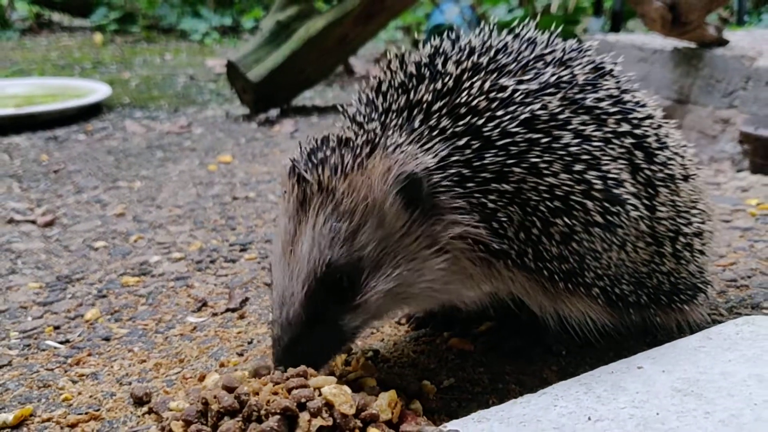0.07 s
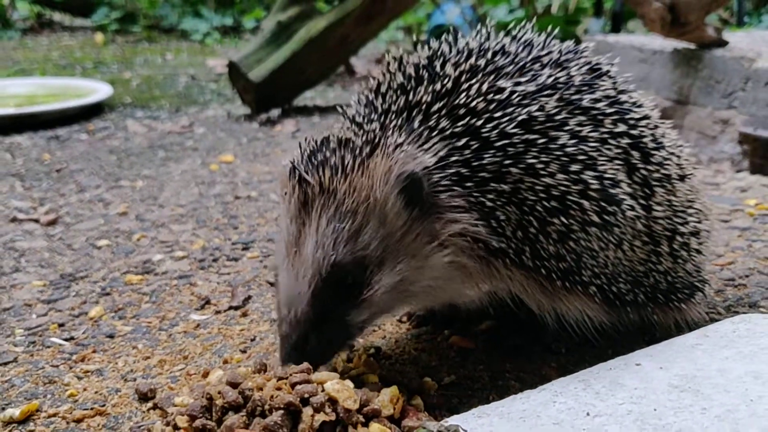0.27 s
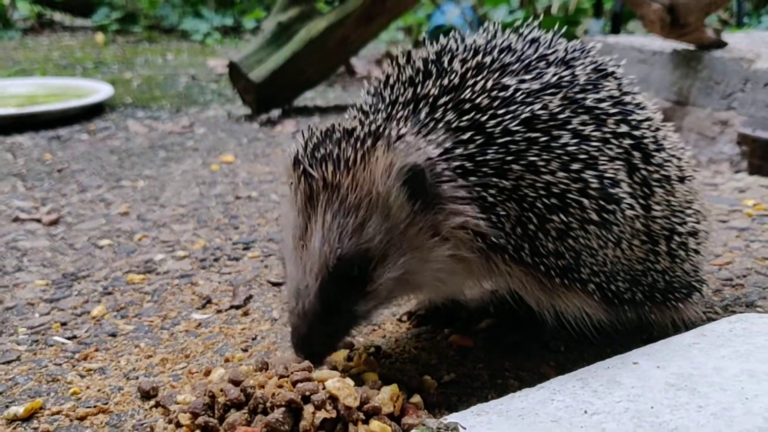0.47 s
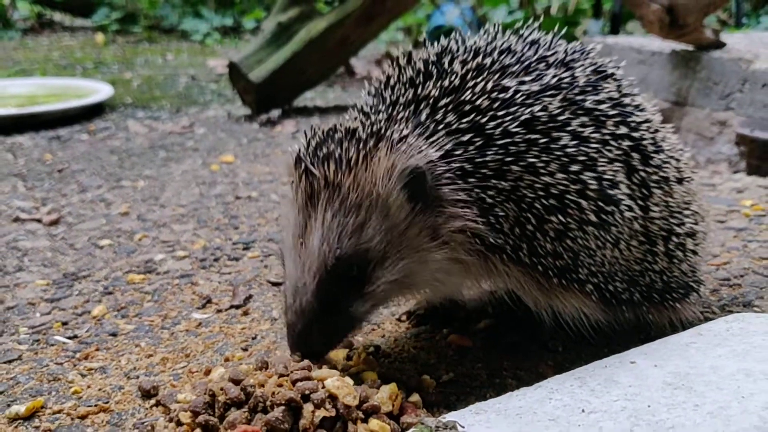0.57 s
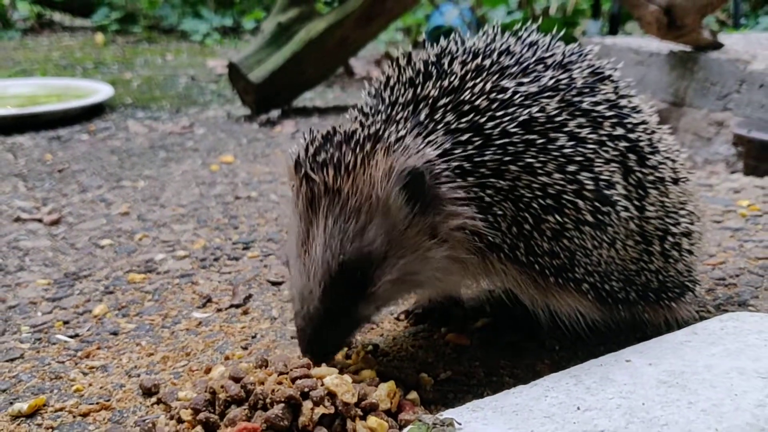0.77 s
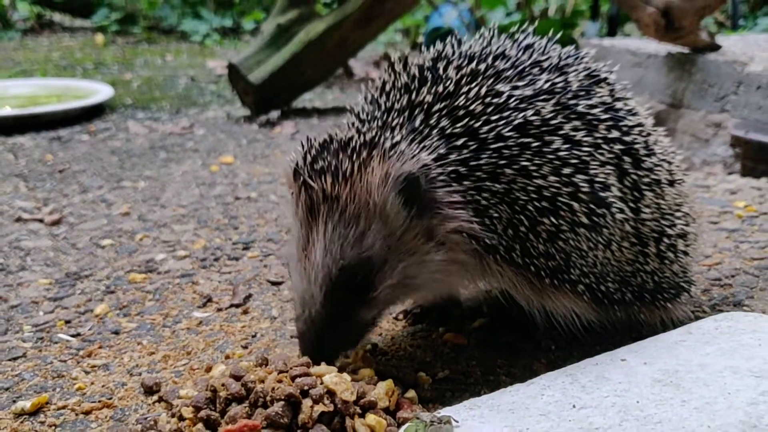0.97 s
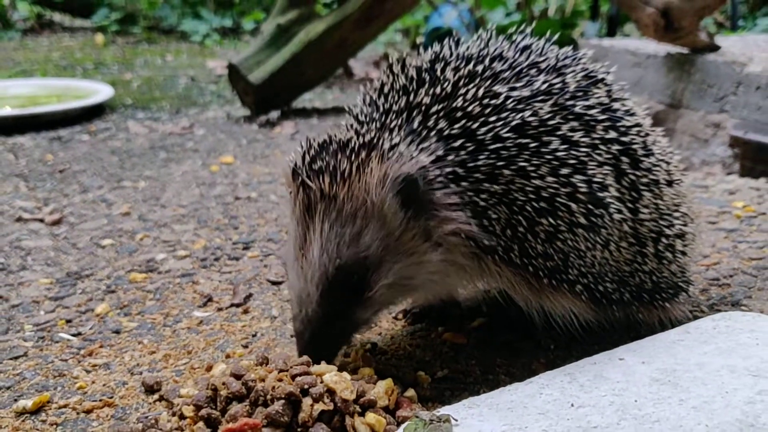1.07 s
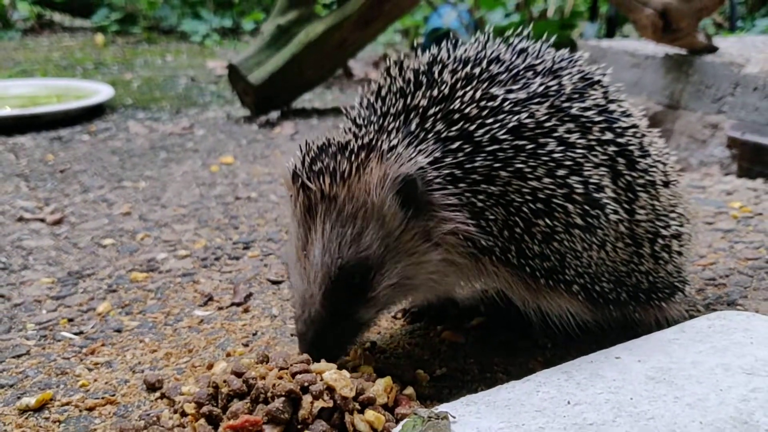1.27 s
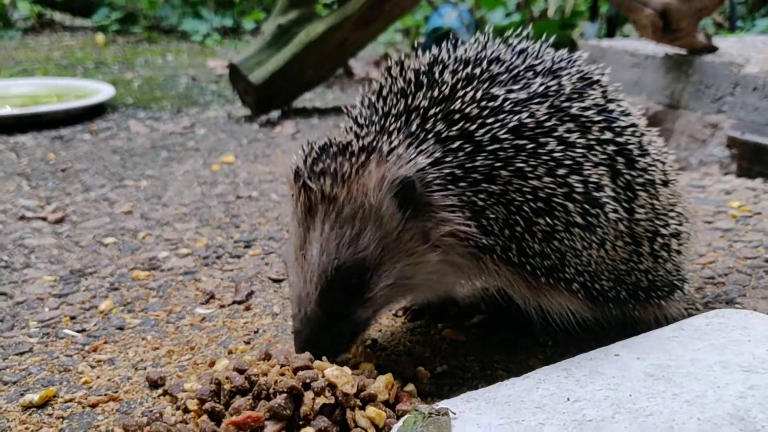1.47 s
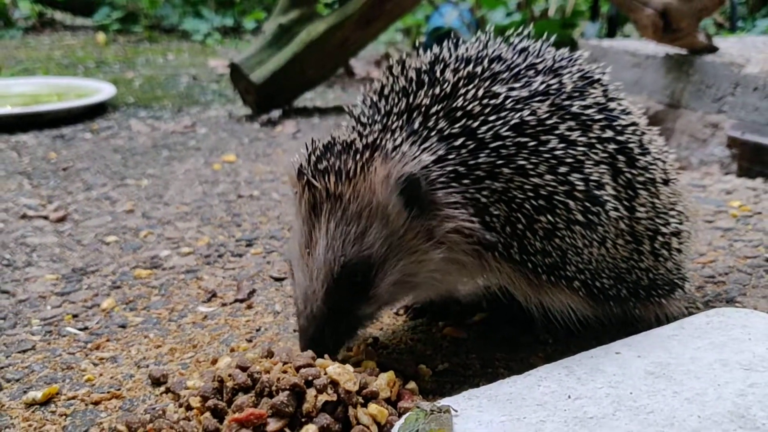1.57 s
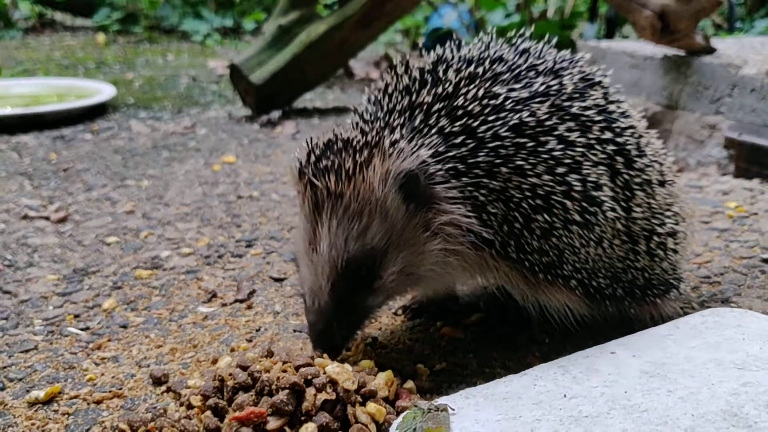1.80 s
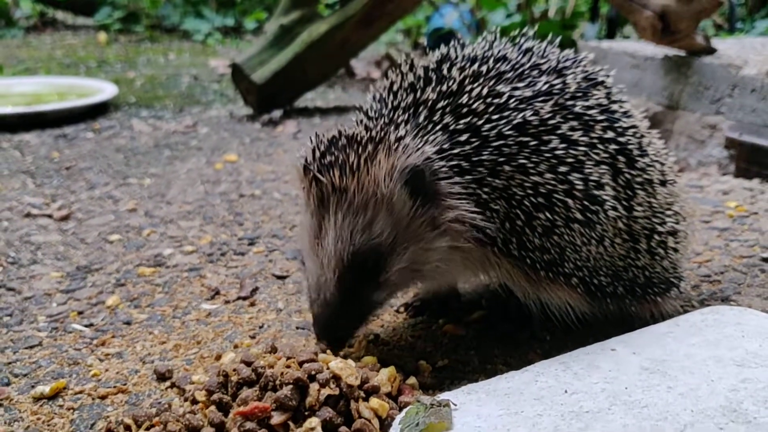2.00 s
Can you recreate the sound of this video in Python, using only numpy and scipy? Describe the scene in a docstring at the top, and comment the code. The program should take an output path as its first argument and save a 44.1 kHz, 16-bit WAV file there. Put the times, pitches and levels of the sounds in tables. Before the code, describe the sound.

Hedgehog crunching dry kibble, sparse brittle clicks and one loud snap, over faint far traffic rumble

```python
"""Far traffic rumble, a faint machine hum and microphone hiss; over them a hedgehog chews dry kibble.
Traffic and hiss are coloured noise; the hum is a deep tone and four upper tones that waver.
Each bite is a brittle fracture: a sharp pulse ringing at the piece's pitch, then scattered noise.
One piece snaps loudly and adds a knock of damped sines. Patio scene, close stereo microphone."""
import sys
import numpy as np
from scipy import signal
from scipy.fft import rfft, irfft
from scipy.io import wavfile

SR = 44100
rng = np.random.default_rng(int(sys.argv[2]) if len(sys.argv) > 2 else 0)


def materialize(psi):
    """Save the field psi as 16-bit PCM at rate SR to the path in sys.argv[1].

    A 1-D psi becomes a single channel; in a 2-D psi each row is a channel.
    """
    bounded = np.clip(np.atleast_2d(psi).T, -1, 1)
    quanta = np.round(bounded * 32767).astype(np.int16)
    wavfile.write(sys.argv[1], SR, quanta)


N = 90008

# traffic density, common to both sides: f/Hz, level/dB per Hz
TRAFFIC_MID_DENSITY = [(8, -82), (22, -69.5), (44, -78), (70, -77), (100, -73), (260, -75.6), (420, -81.5),
                       (650, -81), (1000, -88.5), (1500, -95.5), (2300, -106), (4000, -118), (9000, -135)]
# traffic density, opposite on the two sides: f/Hz, level/dB per Hz
TRAFFIC_SIDE_DENSITY = [(8, -96), (45, -98), (100, -88), (300, -88), (550, -87), (750, -83.5), (1000, -87),
                        (1500, -93), (2300, -106.5), (4000, -118), (9000, -135)]
# gain on the traffic: t/s, level/dB
TRAFFIC_GAIN = [(0, -0.4), (.45, 0), (.85, 0.7), (1.15, -.5), (1.6, -0.7), (2.04, 0)]
# deep tone of the hum: t/s, rms level/dB
DRONE_LEVEL_DB = [(0, -61), (.2, -57), (.35, -64), (.44, -53), (.6, -52.5), (.85, -54.5), (.97, -51),
                  (1.07, -64), (1.25, -54), (1.37, -54), (1.45, -63), (1.56, -56), (1.7, -64), (1.83, -53),
                  (2.04, -53)]
# upper tones of the hum: f/Hz, mean rms level/dB, width/Hz, power share differing between sides/1
HUM_TONES = [(361.2, -65, 6, 0.22), (539.5, -67.5, 11.8, 0.091), (719, -68, 11.8, .55),
             (839, -69.5, 12, .6)]
# hiss density of each microphone: f/Hz, level/dB per Hz
HISS_DENSITY = [(1000, -111), (3700, -111.5), (6000, -112), (9000, -112.7), (12000, -112.9),
                (15800, -112.4)]
# kibble fractures: t/s, level/dB, top treble lift/dB, piece ring f/Hz
CRACK_EVENTS = [(.181, -69, 0, 4500), (.1975, -65.5, 4, 8300), (.3000, -60.5, 0, 8200),
                (.3121, -63, -2, 7500), (.3141, -51.5, 2, 7400), (.3147, -59, -6, 4100),
                (.3162, -59, -2, 7500), (.6754, -70, -4, 4600), (.7193, -62, -2, 7800),
                (.8810, -66, 2, 7300), (.8907, -69, -2, 7300), (1.0257, -66, 14, 7000),
                (1.4867, -67, -2, 8300), (1.5726, -68, 18, 14500), (1.6186, -61.5, 5, 4700),
                (1.6220, -66, 2, 4900), (1.6794, -69, -4, 8300), (1.7024, -66, 2, 8000),
                (1.7946, -63, 1, 8400), (1.7995, -66, -3, 4600), (1.8074, -68, -4, 4500),
                (1.8129, -67, -3, 4400), (1.8583, -55.5, -2, 8200), (1.8599, -54, 0, 4600),
                (1.8812, -60, -1, 8200), (1.9074, -67.5, 17, 14800), (1.9547, -66, 15, 15000),
                (2.0353, -66, 2, 8000)]
# the one piece that snaps through: t/s, level/dB, top treble lift/dB, piece ring f/Hz
SNAP_EVENT = (1.8664, -41.3, -2, 8300)
# relative spectrum of a fracture: f/Hz, level/dB
CRACK_SPECTRUM = [(300, -28), (1200, -10), (2200, -9), (2900, -6), (3500, -10), (4400, -2), (5200, -3),
                  (6200, -1), (7900, 0), (9200, -9), (11000, -9), (15500, -14)]
# modes of the snapping piece: f/Hz, level re KNOCK_DB/dB, t60/s
KNOCK_MODES = [(1320, 1.2, 0.0088), (1750, -7, 0.0045), (2750, -10, .006), (4610, -1.6, 0.0047),
               (6000, -3, .005), (8300, -6, .004), (10300, -7.3, 0.006)]

SWELL_DB, SWELL_HZ = 0.34, 4.3  # random traffic swell: spread, bandwidth
DRONE_HZ, DRONE_WANDER_HZ = 59.3, 0.6
HUM_WAVER_DB = 1.5
# noise tail of a fracture: amplitude decay constants, levels re the direct pulse
CRUMBLE_S, CRUMBLE_DB = 0.0006, -3  # splinters
SCATTER_S, SCATTER_DB = 0.0049, -8.5
YARD_S, YARD_DB = 0.02, -14  # reflections
RIGHT_LAG_S, CRACK_PAN_DB = 0.000055, 2  # left leads and is louder
PIECE_RING_DB, PIECE_WIDTH_HZ = 7, 400
TREBLE_HZ = 10100
KNOCK_DB, KNOCK_RISE_S = -34, 0.00027
TOP_HZ = 15850


def undb(db):
    """Decibels to amplitude gain."""
    return 10 ** (np.asarray(db) / 20)


def colour(points, hz):
    """Gain at hz from a (f/Hz, level/dB) table, linear in dB over log frequency."""
    f_hz, db = np.array(points, float).T
    return undb(np.interp(np.log(np.maximum(hz, 1)), np.log(f_hz), db))


def noise(points):
    """Gaussian noise with the tabled density per Hz."""
    hz = np.fft.rfftfreq(N, 1 / SR)
    white = rfft(rng.standard_normal(N))
    return irfft(white * colour(points, hz) * np.sqrt(SR / 2), N)


def walk(rate_hz):
    """Zero-mean random drift of unit spread: noise under a Gaussian low-pass."""
    hz = np.fft.rfftfreq(N, 1 / SR)
    lowpass = np.exp(-(hz / rate_hz) ** 2) * (hz > 0)
    drift = irfft(rfft(rng.standard_normal(N)) * lowpass, N)
    return drift / drift.std()


def level_curve(points):
    """A (t/s, level/dB) table joined linearly, in dB per sample."""
    return np.interp(np.arange(N) / SR, *np.array(points).T)


def traffic():
    """Far rumble: coloured mid and side noise under one slowly swelling level."""
    mid, side = noise(TRAFFIC_MID_DENSITY), noise(TRAFFIC_SIDE_DENSITY)
    db = level_curve(TRAFFIC_GAIN) + SWELL_DB * walk(SWELL_HZ)
    return np.array([mid + side, mid - side]) * undb(db)


def drone():
    """Deep hum tone: a sine wandering in pitch, swelling and sinking alike on both sides."""
    f_hz = DRONE_HZ + DRONE_WANDER_HZ * walk(2)
    phase = 2 * np.pi * np.cumsum(f_hz) / SR
    return np.sqrt(2) * undb(level_curve(DRONE_LEVEL_DB)) * np.sin(phase)


def hum():
    """Upper hum tones: sines wavering in pitch and level, phase-offset between the sides."""
    out = np.zeros((2, N))
    for hz, db, width_hz, share in HUM_TONES:
        f_hz = hz + width_hz / 2 * walk(width_hz)
        phase = 2 * np.pi * np.cumsum(f_hz) / SR
        # opposite phase offsets put this share of the power in the side signal
        offset = np.arcsin(np.sqrt(np.clip(share, 0, 1))) * np.array([[1], [-1]])
        gain = undb(db + HUM_WAVER_DB * walk(width_hz))
        out += np.sqrt(2) * gain * np.sin(phase + offset)
    return out


def hiss():
    """Microphone hiss: independent coloured noise on each side."""
    return np.array([noise(HISS_DENSITY), noise(HISS_DENSITY)])


def causal(gain):
    """Minimum-phase spectrum of this gain: the sharpest one-sided pulse, by folded cepstrum."""
    cepstrum = irfft(np.log(gain))
    half = len(cepstrum) // 2
    cepstrum[1:half] *= 2
    cepstrum[half + 1:] = 0
    return np.exp(rfft(cepstrum))


def fracture_tail(size):
    """Splinters, scatter and reflections: decaying noise, independent on each side."""
    t = np.arange(size) / SR
    tail = 0
    for decay_s, tail_db in ((CRUMBLE_S, CRUMBLE_DB), (SCATTER_S, SCATTER_DB), (YARD_S, YARD_DB)):
        env = np.exp(-t / decay_s) * (1 - np.exp(-t / CRUMBLE_S))
        env = env / np.linalg.norm(env)
        tail = tail + undb(tail_db) * rng.standard_normal((2, size)) * env
    return tail


def fracture(db, treble_db, ring_hz, size=4096):
    """Brittle break: a pulse and its tail, coloured by the material and the piece's own ring."""
    hz = np.fft.rfftfreq(size, 1 / SR)
    lag_s = round(RIGHT_LAG_S * SR) / SR  # whole samples
    left = undb(CRACK_PAN_DB / 2) + 0 * hz
    right = undb(-CRACK_PAN_DB / 2) * np.exp(-2j * np.pi * hz * lag_s)
    direct = np.array([left, right])
    ring_db = PIECE_RING_DB / (1 + ((hz - ring_hz) / PIECE_WIDTH_HZ) ** 2)
    gain = colour(CRACK_SPECTRUM, hz) * undb(ring_db)
    lift = undb(treble_db / (1 + (TREBLE_HZ / (hz + 1)) ** 8))
    # db: rms of the direct pulse over 1 ms, before pan and treble lift
    scale = undb(db) * np.sqrt(SR / 1000 / np.mean(gain ** 2))
    pulse = rfft(fracture_tail(size)) - direct  # first swing negative
    return scale * irfft(pulse * causal(gain * lift), size)


def knock(size=2048):
    """Damped modes of the snapping piece, later and quieter on the right."""
    t = np.arange(size) / SR
    ring = np.zeros(size)
    for hz, db, t60_s in KNOCK_MODES:
        decay = np.exp(-np.log(1000) * t / t60_s)
        ring += undb(db + KNOCK_DB) * np.sin(2 * np.pi * hz * t) * decay
    ring = ring * (1 - np.exp(-t / KNOCK_RISE_S))
    right = np.interp(t - RIGHT_LAG_S, t, ring) * undb(-CRACK_PAN_DB)
    return np.array([ring, right])


def add(out, start_s, sound):
    """Mix a stereo sound into out at start_s."""
    i = max(int(start_s * SR), 0)
    part = sound[:, :max(N - i, 0)]
    out[:, i:i + part.shape[1]] += part


def chewing():
    """Kibble breaking between the jaws: small fractures, and one loud snap with its knock."""
    out = np.zeros((2, N))
    add(out, SNAP_EVENT[0], knock())
    for start_s, db, treble_db, ring_hz in [SNAP_EVENT, *CRACK_EVENTS]:
        add(out, start_s, fracture(db, treble_db, ring_hz))
    return out


def scene():
    """Chewing over traffic, hum and hiss."""
    return traffic() + drone() + hum() + hiss() + chewing()


def record(dry):
    """Recorder: steep elliptic low-pass at TOP_HZ."""
    lowpass = signal.ellip(10, 0.1, 70, TOP_HZ, fs=SR, output="sos")
    return signal.sosfilt(lowpass, dry)


dry = scene()
out = record(dry)
materialize(out)
```